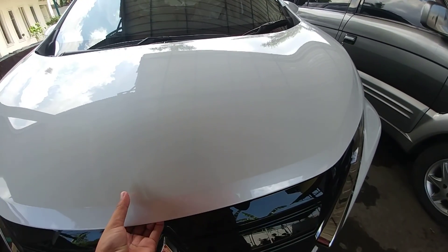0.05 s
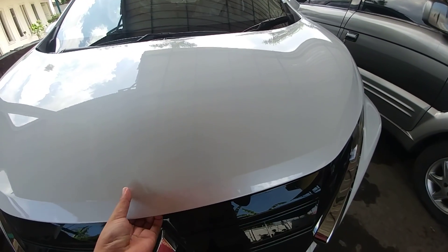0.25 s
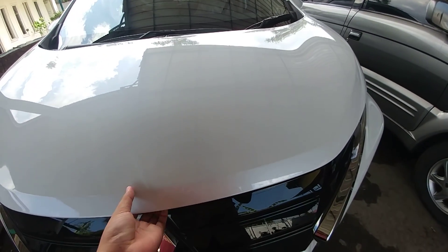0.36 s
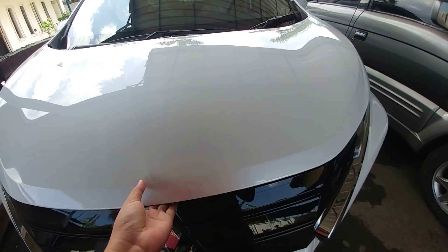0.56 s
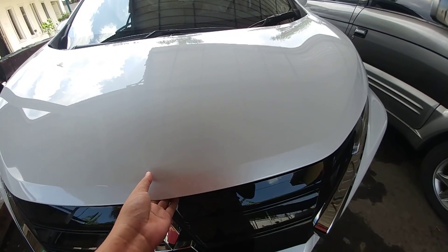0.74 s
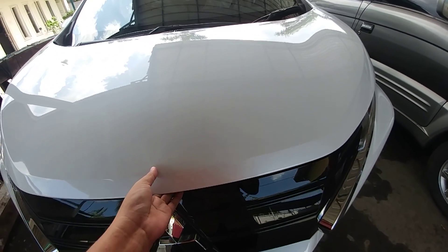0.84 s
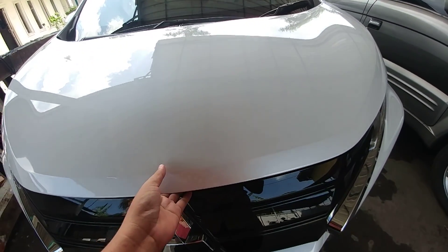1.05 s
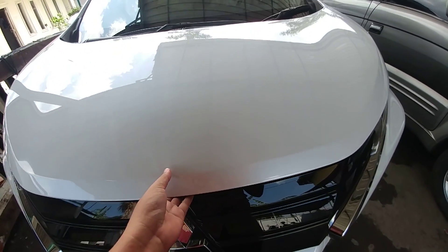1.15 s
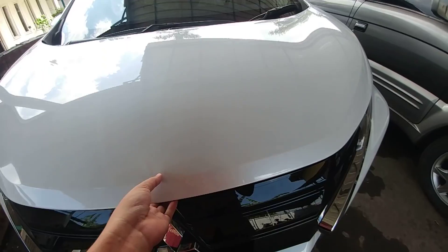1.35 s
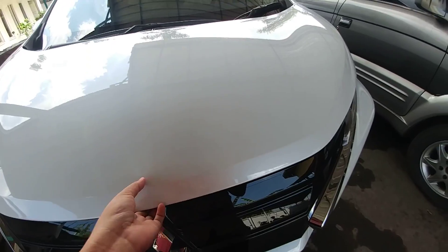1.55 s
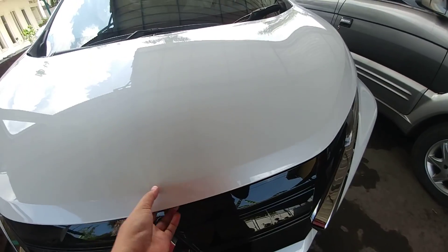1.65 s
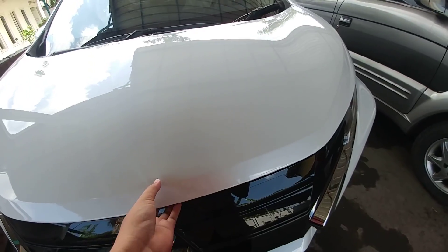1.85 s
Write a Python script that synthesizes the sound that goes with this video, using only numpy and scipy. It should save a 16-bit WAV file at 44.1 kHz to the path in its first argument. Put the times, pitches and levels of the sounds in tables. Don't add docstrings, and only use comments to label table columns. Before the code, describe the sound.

A car bonnet knocks at close range outdoors. After faint finger rustle, a hard double clack at 0.2 to 0.25 seconds sets the thin steel panel booming, with weaker bounces until 0.4 and a small tick near 0.5. Quiet rubbing and low distant traffic follow. Around 1.64 a lighter, dull knock lands, with faint thin metal squeaks from 1.45 and small catch ticks near 1.77 and 1.89.

```python
import sys
import numpy as np
from scipy import signal
from scipy.fft import rfft, irfft, next_fast_len
from scipy.io import wavfile

SR = 44100
rng = np.random.default_rng(int(sys.argv[2]) if len(sys.argv) > 2 else 0)


def int16_out(signal):
    q = np.round(np.clip(np.atleast_2d(signal).T, -1, 1) * 32767)
    wavfile.write(sys.argv[1], SR, q.astype(np.int16))


def decibels_to_gain(level_db):
    exponent = np.asarray(level_db, float) / 20
    return 10 ** exponent


N = 83790

# freq_hz, density_db
TRAFFIC = [(18, -24), (30, -1.5), (145, -3.5), (243, -10), (298, -14.5), (358, -10.5), (579, -11),
           (672, -13.5), (2500, -40.5), (3250, -118), (5500, -120)]
# time_s, gain_db
TRAFFIC_SWELL = [(0, -1), (0.499, 1), (.68, -1.5), (1.1, 0), (1.6, -1), (1.9, 3)]
# time_s, gain_db
DRONE_SWELL = [(0, 1), (.5, 0.1), (.8, 0.1), (.9, 0.5), (1.02, 3.5), (1.06, -1.5), (1.15, -4.5), (1.19, 1),
               (1.25, -1.5), (1.4, 3), (1.49, 6), (1.55, 0.5), (1.9, 4)]
# freq_hz, density_db
AIR = [(1500, 3.5), (3000, 4), (6000, -1.5), (11000, 5), (13000, -18.5), (15500, 7)]
# freq_hz, correlation
LIKENESS = [(60, 0.96), (180, 0.95), (550, 0.39), (1650, -0.64), (4970, 0.043), (15000, -0.11)]
# middle_s, half_length_s, level_db, centre_hz,
# width_hz
RUBS = [(0.2, 0.058, -61.5, 7140, 8600), (0.034, 0.0081, -66, 2700, 420), (0.507, 0.033, -59.5, 9300, 4700),
        (.74, 0.065, -71.5, 7200, 1100), (1.07, .051, -57, 13600, 1200), (1.068, 0.08, -60, 7500, 16000),
        (1.363, 0.095, -58.5, 7080, 2000), (1.363, 0.12, -64.5, 4740, 2200), (1.534, 0.12, -63, 6200, 6600),
        (1.38, .06, -66, 11500, 3000), (1.83, .08, -58, 900, 600), (.59, .03, -60, 1200, 900),
        (.2495, .007, -50, 11500, 3500), (.277, .008, -58, 6700, 1500), (1.852, .006, -62, 11000, 1500), ]
# start_s, end_s, level_db, start_hz, end_hz
SQUEALS = [
    (1.44, 1.53, -66, 3240, 3200),
    (1.52, 1.63, -69, 3130, 3180),
    (1.635, 1.78, -61.5, 3260, 3290),
    (1.76, 2.0, -61, 3290, 3290),
    (.39, .5, -73, 11400, 11350),
    (1.33, 1.44, -74, 11400, 11400),
]
# start_s, level_db, t60_s, centre_hz, width_hz
TICKS = [(0.135, -57, 0.17, 6550, 5900), (0.2057, -46, 0.38, 2570, 714), (0.213, -45.5, 0.14, 3710, 590),
         (0.2068, -51.5, 0.2, 5800, 5970), (0.2435, -49, 0.28, 1300, 1190),
         (0.2446, -48, 0.088, 6960, 7000), (0.246, -53, 0.34, 3500, 5000), (0.497, -52, 0.033, 2220, 2480),
         (.498, -54.5, .025, 8050, 9000), (0.596, -54, 0.028, 8300, 9100), (1.64, -54, 0.05, 2370, 1500),
         (1.639, -56.5, 0.07, 9000, 9400), (1.768, -50.5, 0.24, 10200, 11900),
         (1.768, -57.5, 0.64, 2160, 453), (1.7685, -54, 0.5, 3870, 5100), (1.768, -52.5, 0.24, 3250, 2000),
         (1.887, -51.5, 0.24, 1120, 1480)]
# start_s, pitch_hz, level_db, t60_s
THUDS = [(.2445, 1000, -24, .05), (.2445, 530, -18, .07), (1.6725, 110, -32, .08), (.811, 560, -37, .025),
         (.497, 330, -44, .2), (1.345, 570, -43, .08), (1.638, 2000, -38, .02), (1.648, 1000, -38, .12),
         (.2115, 195, -19, .12), (.2445, 1700, -36, .06), (1.769, 1050, -47, .12), (.343, 235, -27, .08)]
# pitch_hz, level_db, t60_s
MODES = [(70.3, -17, 0.57), (84.25, -17.5, 0.57), (55.4, -27, 0.91), (197.5, -14.5, 0.16),
         (224.6, -19, 0.34), (245.4, -25.5, 0.47), (325, -30.5, 0.37), (390, -33, 0.67), (411.7, -18, 0.26),
         (501.5, -21.5, 0.18), (531.6, -26.5, 0.29), (578, -27, 0.87), (589.5, -24, 0.25), (732, -25, 0.12),
         (796, -30, 0.2), (938, -29, 0.25), (1041, -43, 0.3), (1176, -48, 0.051), (1382, -40, 0.2),
         (1470, -47.5, 0.61), (1450, -76, 0.25), (1600, -42, 0.12), (1996, -49, 0.067), (147.8, -27, 0.36)]
# pitch_hz, level_db, t60_s
RIM = [(185.7, -35, 0.16), (263, -34.5, 0.14), (385.4, -41.5, 0.3), (506, -32.5, 0.19), (586.4, -23, 0.067),
       (617, -18.5, 0.05), (733, -38, 0.23), (884, -46, 0.19), (983, -32.5, 0.085), (2000, -35, 0.038)]
# start_s, strength_db, boom_db, tilt_db_per_octave (about 400 Hz), damping_factor
BLOWS = [
    (0.2059, 1.5, -2.5, 1.5, 2.07),
    (0.2446, 2.5, -27, 1.5, 1.67),
    (.287, -6.5, -25, -1.5, 1.265),
    (.342, -7.5, -37, -4, 2.5),
    (1.666, -29.5, 14, 0.5, 3),
    (.405, -21.5, -25, -3.5, 2),
]
# freq_hz, gain_db
REACH = [
    [(150, 3.5), (195, 5), (240, 1), (325, -5), (410, -3), (510, 0.5), (590, -7.5), (1000, -4)],
    [(150, 1.5), (195, -3.5), (240, 5.5), (325, -1.5), (410, 1.5), (510, 1.5), (590, -2.5), (1000, -2.5)],
    [(150, 0.1), (195, 0.3), (240, 0), (325, 6), (410, 6), (510, 8), (590, -1.5), (1000, -1)],
    [(150, -3), (195, -1), (240, -3), (325, -5), (410, 4.5), (510, 3.5), (590, -4), (1000, -3)],
    [(150, 1), (1000, 12)],
    [(150, 1), (195, -0.5), (240, 6.5), (325, -3), (410, 0.5), (510, -2), (590, -22), (1000, -8)],
]
BOOM_LAG_S = (.002, .0057, .008)
# freq_hz, gain_db
PORTS = [
    [(300, 0.5), (1300, 1), (2400, -1.5), (6700, -3.5), (8300, -13), (9800, -4.5), (11000, 2), (14000, -7)],
    [(300, 0.94), (1300, 0.9), (2400, 2.5), (5500, 4), (6750, 8.5), (8300, -7), (9800, -13.5), (14200, -3)],
]

TRAFFIC_DB, AIR_DB = -45.5, -63.5
DRONE_HZ, DRONE_WIDTH_HZ, DRONE_DB = 538.6, 38, -56.5
SQUEAL_RISE_S, SQUEAL_WOBBLE_HZ, SQUEAL_ROUGH = .02, 45, .55
GRAIN_DB = 2.0
RIM_KNOCK_S = 1.637
RISE_S, THUD_RISE_S, BOOM_RISE_S, MINOR_RISE_S = .004, .002, .018, .003
MODE_SCATTER_DB, MINOR_SCATTER_DB = 2, 5
MINOR_DB, MINOR_T60_S = -37.5, .43
MINOR_TILT_DB, MINOR_SHORTEN = -6.5, .47
CLATTER_DB, CLATTER_T60_S, CLATTER_BAND_HZ = -38, .16, [603, 1670]
PORT_LAG_S, LAG_SCATTER = .00022, .5
LOW_CUT_HZ, TOP_HZ = 48, 15750
NOTCH_HZ, NOTCH_WIDTH_HZ, NOTCH_DB = 9000, 420, -11


def at_hz(points, hz):
    points_hz, values = np.transpose(points)
    return np.interp(np.log(hz), np.log(points_hz), values)


def over_time(points):
    return np.interp(np.arange(N) / SR, *np.transpose(points))


def rms_one(x):
    return x / np.sqrt(np.mean(x ** 2) + 1e-20)


def drift(rate_hz):
    r = np.exp(-80 * np.pi * rate_hz / SR)
    white = rng.standard_normal(N // 40 + 2002)
    slow = signal.lfilter([1], [1, -2 * r, r * r], white)[2000:]
    return np.interp(np.arange(N) / 40, np.arange(len(slow)), rms_one(slow))


def resonance(x, hz, width_hz):
    r = np.exp(-np.pi * width_hz / SR)
    return signal.lfilter([1, 0, -1], [1, -2 * r * np.cos(2 * np.pi * hz / SR), r * r], x)


def band_pass(x, order, band_hz):
    return signal.sosfilt(signal.butter(order, band_hz, "band", fs=SR, output="sos"), x)


def dying(start_s, t60_s):
    t = np.arange(N) / SR - start_s
    return (t > 0) * decibels_to_gain(-60 * np.clip(t, 0, 2 * t60_s) / t60_s)


def banded_noise(spectrum, patchy_db):
    out = 0
    together = drift(3.0)
    edges_hz = 25 * 2 ** np.arange(0, 9.4, 1 / 3)
    white = rng.standard_normal((2, 2, N))
    for k, (low_hz, high_hz) in enumerate(zip(edges_hz, edges_hz[1:])):
        hz = np.sqrt(low_hz * high_hz)
        if not spectrum[0][0] * .8 < hz < spectrum[-1][0] * 1.2:
            continue
        mid, side = band_pass(white[k % 2], 2, [low_hz, high_hz])
        alike = np.clip(at_hz(LIKENESS, hz), -1, 1)
        flicker_db = patchy_db * (.6 * together + drift(12))
        gain = decibels_to_gain(at_hz(spectrum, hz) + flicker_db)
        out = out + gain * (np.sqrt(1 + alike) * mid + np.sqrt(1 - alike) * side * [[1], [-1]])
    return rms_one(out)


def strike(start_s, hz, level_db, t60_s, rise_s):
    i = int(start_s * SR)
    since_s = np.arange(min(SR // 2, N - i)) / SR
    lead = 2 * np.pi * hz * PORT_LAG_S * (1 + LAG_SCATTER * rng.uniform(-1.19, 1, len(hz)))
    decay = decibels_to_gain(-60 * since_s / t60_s[:, None])
    phase = 2 * np.pi * hz[:, None] * since_s
    out = np.zeros((2, N))
    for side, port in zip((.5, -.5), out):
        rings = decay * np.sin(phase + side * lead[:, None])
        port[i:i + len(since_s)] = -decibels_to_gain(level_db) @ rings * (1 - np.exp(-since_s / rise_s))
    return out


def yard():
    rumble = decibels_to_gain(TRAFFIC_DB) * banded_noise(TRAFFIC, patchy_db=.6)
    hum = rms_one(resonance(rng.standard_normal(N), DRONE_HZ, DRONE_WIDTH_HZ))
    drone = decibels_to_gain(DRONE_DB + over_time(DRONE_SWELL)) * hum
    air = decibels_to_gain(AIR_DB) * banded_noise(AIR, patchy_db=.8)
    return decibels_to_gain(over_time(TRAFFIC_SWELL)) * (rumble + drone) + air


def rubs():
    t = np.arange(N) / SR
    out = np.zeros((2, N))
    for middle_s, half_s, level_db, hz, width_hz in RUBS:
        hiss = resonance(rng.standard_normal((2, N)), hz, width_hz)
        hiss = rms_one(resonance(hiss, hz, width_hz))
        swell = np.cos(np.pi / 2 * np.clip((t - middle_s) / half_s, -1, 1))
        out += decibels_to_gain(level_db + 0.95 * drift(40)) * swell * hiss
    return out


def squeals():
    t = np.arange(N) / SR
    out = 0
    for start_s, end_s, level_db, start_hz, end_hz in SQUEALS:
        hz = np.interp(t, [start_s, end_s], [start_hz, end_hz]) + SQUEAL_WOBBLE_HZ * drift(142)
        shape = np.clip(np.minimum(t - start_s, end_s - t) / SQUEAL_RISE_S, 0, 1)
        rough = 1 + SQUEAL_ROUGH * drift(130)
        out = out + decibels_to_gain(level_db) * rough * shape * np.sin(2 * np.pi * np.cumsum(hz) / SR)
    return out


def ticks():
    out = np.zeros((2, N))
    for start_s, level_db, t60_s, hz, width_hz in TICKS:
        grain_db = GRAIN_DB * rng.standard_normal(N // 64 + 1).repeat(64)[:N]
        grains = rng.standard_normal((2, N)) * decibels_to_gain(grain_db)
        burst = resonance(resonance(grains, hz, width_hz), hz, width_hz)
        out += decibels_to_gain(level_db) * dying(start_s, t60_s) * rms_one(burst)
    return out


def thuds():
    out = np.zeros((2, N))
    for start_s, hz, level_db, t60_s in THUDS:
        out += strike(start_s, *np.array([[hz], [level_db], [t60_s]]), THUD_RISE_S)
    return out


def bonnet():
    out = strike(RIM_KNOCK_S, *np.transpose(RIM), RISE_S)
    hz, mode_db, t60_s = np.transpose(MODES)
    minor_hz = np.geomspace(440, 1950, 50) * rng.uniform(.97, 1.03, 50)
    minor_octave = np.log2(minor_hz / 500)
    minor_t60_s = MINOR_T60_S * (500 / minor_hz) ** MINOR_SHORTEN
    clatter = rms_one(band_pass(rng.standard_normal((2, N)), 4, CLATTER_BAND_HZ))
    for (start_s, blow_db, boom_db, tilt_db, damping), reach in zip(BLOWS, REACH):
        for k, lag_s in enumerate(BOOM_LAG_S):
            level_db = blow_db + boom_db + mode_db[[k]]
            out += strike(start_s + lag_s, hz[[k]], level_db, t60_s[[k]], BOOM_RISE_S)

        colour_db = at_hz(reach, hz) + tilt_db * np.log2(hz / 400)
        level_db = blow_db + mode_db + colour_db + MODE_SCATTER_DB * rng.standard_normal(len(hz))
        out += strike(start_s, hz[3:], level_db[3:], t60_s[3:] / damping, RISE_S)

        minor_db = blow_db + MINOR_DB + (MINOR_TILT_DB + tilt_db) * minor_octave
        minor_db = minor_db + rng.normal(0, MINOR_SCATTER_DB, 50)
        out += strike(start_s, minor_hz, minor_db, minor_t60_s / damping, MINOR_RISE_S)

        clatter_db = blow_db + 2 * tilt_db + CLATTER_DB
        out += decibels_to_gain(clatter_db) * dying(start_s, CLATTER_T60_S / damping) * clatter
    return out


def scene():
    return yard() + rubs() + squeals() + ticks() + thuds() + bonnet()


def low_pass(x):
    return signal.sosfilt(signal.butter(12, 16440, fs=SR, output="sos"), x)


def record(dry):
    size = next_fast_len(N + 4096)
    hz = np.arange(size // 2 + 1) * SR / size + 1
    ports = decibels_to_gain([at_hz(port, hz) for port in PORTS])
    low_cut = 1 / np.sqrt(1 + (LOW_CUT_HZ / hz) ** 10)
    notch = decibels_to_gain(NOTCH_DB * np.exp(-((hz - NOTCH_HZ) / NOTCH_WIDTH_HZ) ** 4))
    colour = ports * low_cut * notch * (hz < TOP_HZ)
    mix = irfft(rfft(dry, size) * colour, size)[:, :N]
    return low_pass(mix)


dry = scene()
out = record(dry)
int16_out(out)
```